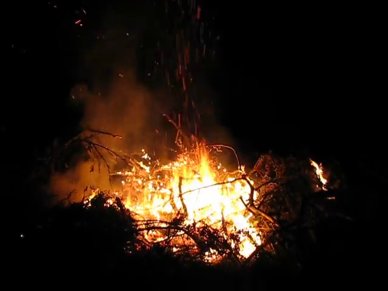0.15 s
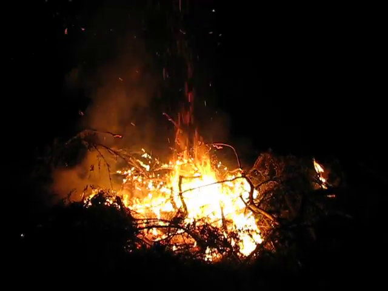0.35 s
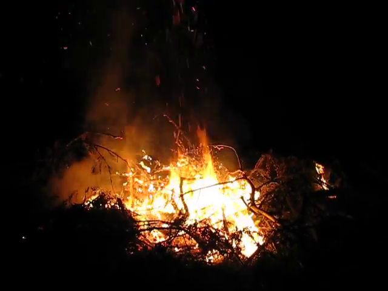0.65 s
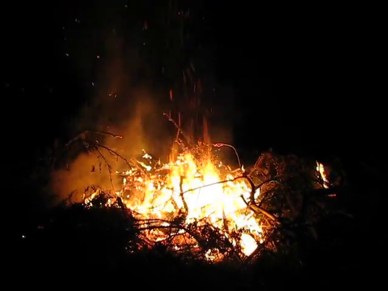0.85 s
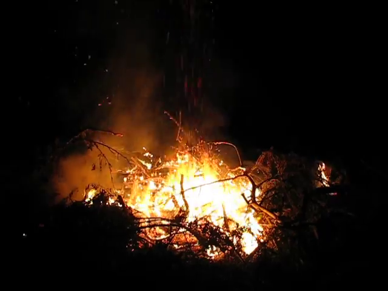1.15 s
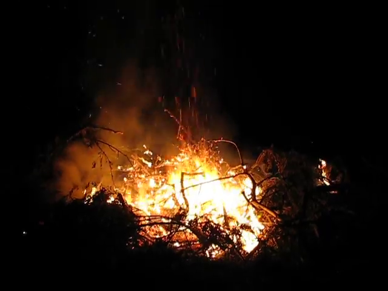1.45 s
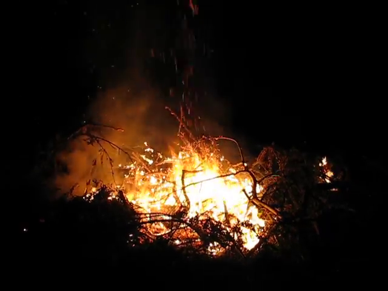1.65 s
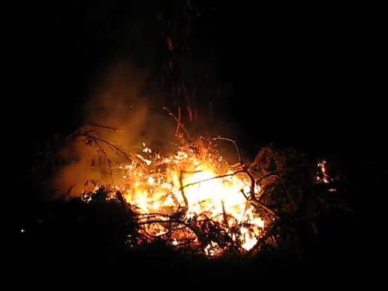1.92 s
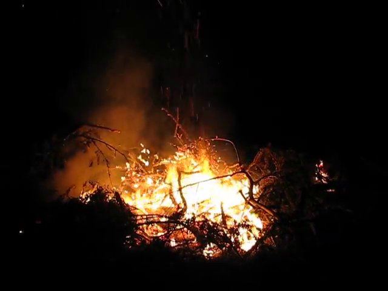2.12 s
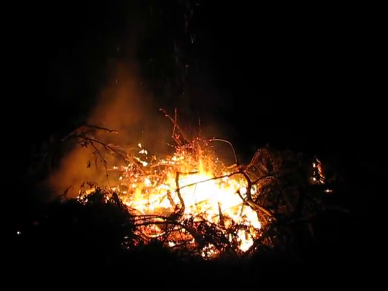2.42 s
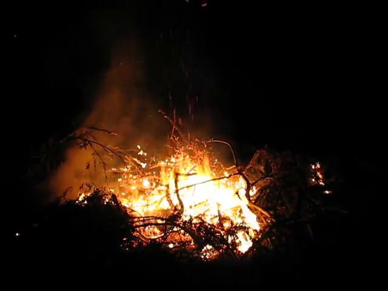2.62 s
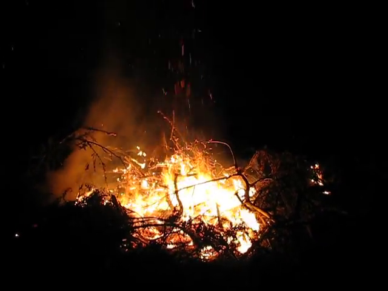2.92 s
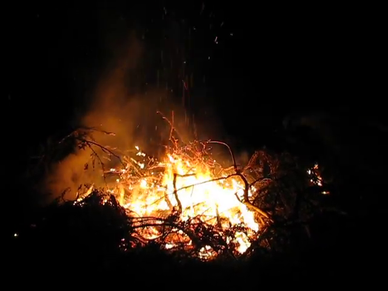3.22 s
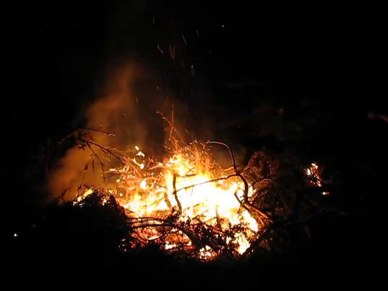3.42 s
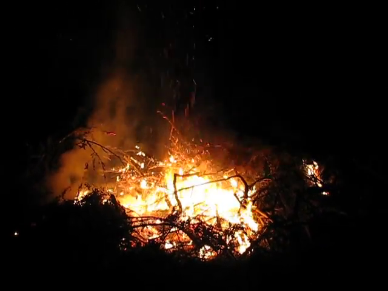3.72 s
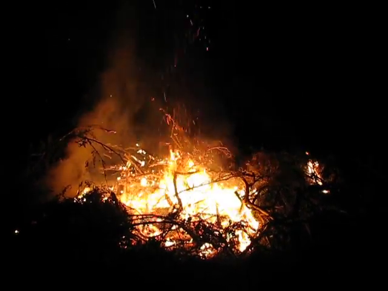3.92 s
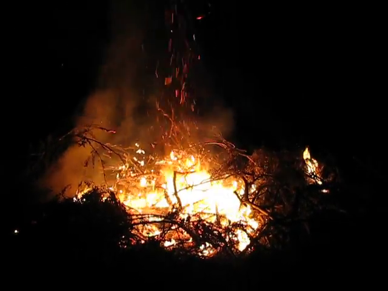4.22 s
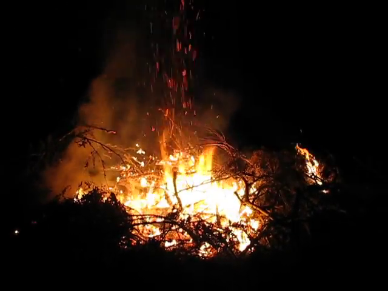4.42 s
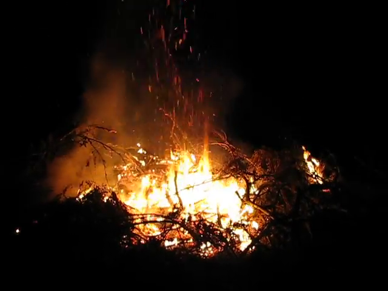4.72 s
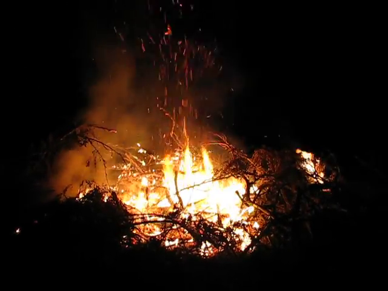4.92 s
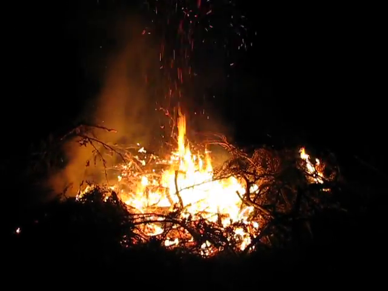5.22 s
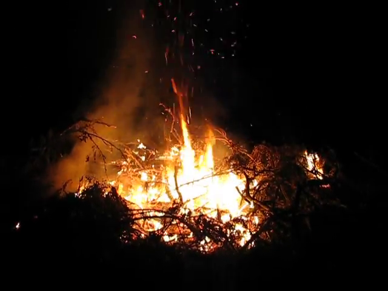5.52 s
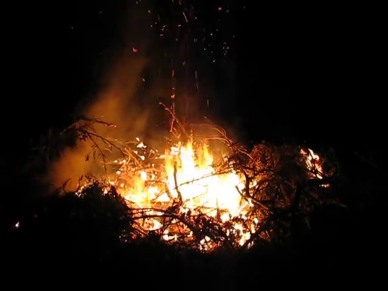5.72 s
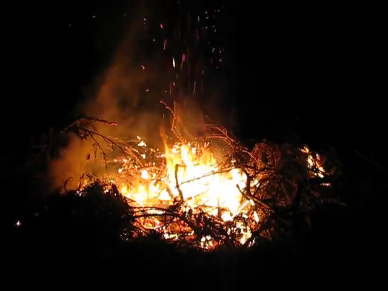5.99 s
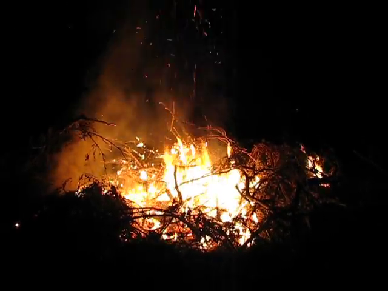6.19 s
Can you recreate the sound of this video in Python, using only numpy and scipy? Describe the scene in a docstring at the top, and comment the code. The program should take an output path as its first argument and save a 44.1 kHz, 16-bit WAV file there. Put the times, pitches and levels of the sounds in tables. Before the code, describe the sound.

Dense bonfire crackle from start to end: crisp dry snaps, clusters of tiny ticks and occasional low thumps under the pops. Breathy steam flares up briefly early on, past the middle and near the end. Low flames rumble gently, and far small night animals blend into a thin steady trill. Open air, close and wide, almost no echo, with slight gain ducking after the hardest cracks.

```python
"""Brush bonfire at night

Sap pockets burst in dry twigs a few metres away: each pop is a quick ring plus a spray of noise.
Smaller bursts make the fine crackle, and low thumps, short sums of fixed tones, lie under some pops.
Coloured noise makes the hissing steam, the low roar of flames and a far chorus of small night animals.
The camera's gain control ducks after the loudest pops, whose peaks are flattened near full scale."""
import sys
import numpy as np
from scipy import signal
from scipy.fft import rfft, irfft, next_fast_len
from scipy.io import wavfile
from scipy.ndimage import uniform_filter1d, map_coordinates

SR = 44100
rng = np.random.default_rng(int(sys.argv[2]) if len(sys.argv) > 2 else 0)


def pcm_store(signal):
    """Save signal as 16-bit PCM."""
    levels = np.round(np.clip(np.atleast_2d(signal), -1, 1) * 32767)
    wavfile.write(sys.argv[1], SR, levels.astype(np.int16).T)


N = 280014  # length in samples

# The loudest sap pockets bursting: t/s, level/dB, f/Hz of the ring, spray's fall by 60 dB/s
POPS = [(.0334, -2.5, 4430, 0.01), (.0414, -7.5, 8640, .0075), (.1483, -6.5, 6900, 0.019),
        (.1874, -3, 5160, 0.01), (.211, -17, 6900, .006), (.311, -17, 6600, .0068),
        (.4032, -11, 6230, 0.012), (.4987, -14, 7100, .0059), (.5396, -6.5, 8800, 0.0068),
        (.601, -10, 7400, 0.03), (.6137, 3, 5500, 0.008), (.7931, -4.5, 6330, 0.01),
        (.8751, -18, 4300, 0.026), (.8927, -6.5, 2550, 0.009), (.9225, -15, 4500, 0.012),
        (1.0373, 3.5, 5740, 0.0062), (1.049, -11, 7500, 0.0055), (1.427, -9, 4730, 0.0057),
        (1.5194, -12, 3830, 0.011), (1.5598, -17, 3140, .02), (1.6048, 3.5, 6600, 0.0055),
        (1.6148, -10, 5800, 0.011), (1.8143, -9, 9250, .011), (1.8489, -16, 5170, 0.02),
        (1.9118, -6, 5900, 0.0089), (1.984, -14.5, 8100, 0.01), (1.9973, -13, 9000, .007),
        (2.0126, -12, 4930, 0.012), (2.0632, -9.5, 3370, 0.03), (2.0711, -6, 4770, 0.01),
        (2.202, -3.5, 7260, 0.0037), (2.2792, -11.5, 6800, .022), (2.3612, 1, 7600, 0.0054),
        (2.5037, -15.5, 7100, 0.019), (2.5644, -5.5, 4000, 0.0057), (2.6212, -13, 6500, .0087),
        (2.6836, -12, 8250, .0077), (2.7108, -6, 4100, 0.0059), (2.7455, -3.5, 5800, 0.0071),
        (2.8524, -9, 6660, 0.0094), (2.9249, -6, 5300, 0.0018), (3.1011, -13.5, 8050, 0.022),
        (3.1339, -13.5, 5630, 0.03), (3.1582, 0.5, 6360, 0.0083), (3.2163, -5.5, 5900, 0.0069),
        (3.228, -15, 5400, 0.0043), (3.2418, -14.5, 2240, 0.033), (3.2953, -10.5, 4340, 0.0078),
        (3.3212, -9, 3900, 0.014), (3.4602, -5.5, 8050, 0.0043), (3.4964, -18, 5560, 0.042),
        (3.6067, -15, 3850, .02), (3.6774, -13.5, 6200, 0.029), (3.6979, -10, 6900, 0.0078),
        (3.7789, -10.5, 7500, .01), (3.8304, -9.5, 4730, 0.0098), (3.9412, -7, 9350, .0024),
        (3.9703, -12, 5100, 0.011), (3.9939, -3, 7500, 0.0062), (4.1385, -11.5, 8550, .0069),
        (4.2099, -11.5, 6140, 0.0095), (4.2245, -8, 9100, 0.005), (4.2515, -2.5, 7800, .0073),
        (4.3804, -8.5, 5550, .013), (4.389, -7, 2520, 0.011), (4.408, -11, 5170, 0.0088),
        (4.4317, -5.5, 7200, 0.0055), (4.4613, -10, 7800, 0.02), (4.4701, -12, 7100, .0071),
        (4.516, 8.5, 2600, 0.0044), (4.6246, -9.5, 7950, 0.0081), (4.6686, -10, 7000, .0091),
        (4.6741, -4.5, 4830, 0.0042), (4.69, -9, 8600, 0.012), (4.7349, -10.5, 7700, 0.015),
        (4.7472, -6, 6200, 0.011), (4.7771, -8.5, 6760, 0.027), (4.8675, -7.5, 8300, 0.015),
        (4.9208, -13, 7900, 0.0071), (4.9638, -10.5, 5760, .011), (5.0144, -8.5, 6500, 0.024),
        (5.1346, -6.5, 7150, 0.0083), (5.1983, -5.5, 5500, 0.014), (5.2433, 8, 4460, 0.007),
        (5.4518, -7.5, 6500, 0.0099), (5.5461, -7.5, 5030, 0.016), (5.5873, -11, 4630, 0.0086),
        (5.6137, -12, 8800, .006), (5.7257, -7, 9900, 0.0085), (5.7313, -3.5, 7800, 0.0057),
        (5.7395, -7, 5560, 0.013), (5.8079, -15, 7900, .013), (5.8898, -8, 5140, 0.0064),
        (5.8969, -3.5, 4800, 0.016), (5.9157, -7, 8300, 0.0057), (6.0997, -4, 5750, 0.0055),
        (6.1636, -14, 8600, 0.016), (6.1739, -7, 8850, .0045), (6.1956, -11, 5100, 0.031),
        (6.2941, -6, 4300, .0094), (6.3319, -5, 6500, 0.0049)]


def pops():
    """The loudest sap pockets burst at their listed times."""
    return bursts(POPS)


TICK_DB, TICK_SPREAD_DB, TICK_TOP_DB = -31, 6.5, -17  # lowest level, mean excess before the cap, cap
TICK_HZ, TICK_T60_S = 7500, .0045  # middle pitch and spray fade
RUN_GAP_S, REST_GAP_S, RUN_SHARE = .004, .02, .5  # mean gap in a run, mean gap otherwise, share in runs


def crackle(count=1100):
    """Many small twigs tick at random, most of them faint, often a few in a row."""
    u, g = rng.random((count, 3)), rng.standard_normal((count, 2))
    mean_gap = np.where(u[:, 2] < RUN_SHARE, RUN_GAP_S, REST_GAP_S)
    s = np.cumsum(-np.log(u[:, 0]) * mean_gap) % (N / SR)  # times past the end wrap to the start
    db = np.minimum(TICK_DB - TICK_SPREAD_DB * np.log(u[:, 1]), TICK_TOP_DB)
    hz = np.clip(TICK_HZ * np.exp(0.36 * g[:, 0]), 700, 13000)
    t60 = TICK_T60_S * np.exp(0.92 * g[:, 1])
    return bursts(np.transpose([s, db, hz, t60]), size=256)


RING_SIZE, SPRAY_SIZE, SPRAY_RISE_S = 2.4, .45, .0002
RING_CYCLES = 3.5  # cycles in which the ring falls by 60 dB


def bursts(rows, size=512):
    """Each burst: a sudden pull that rings a cycle or two, and a spray of splinters."""
    s, db, hz, t60 = np.transpose(rows)[:, :, None]
    t = np.arange(size) / SR
    luck = rng.standard_normal((len(s), 2, size))
    fade = amp(-60 * t / np.clip(t60, .002, .04)) * (1 - np.exp(-t / SPRAY_RISE_S))
    ring_fade = amp(-60 * t * hz / RING_CYCLES) * (1 - np.exp(-t * hz / 0.23))
    ring = -np.sin(2 * np.pi * hz * t) * ring_fade

    r = np.fft.rfftfreq(size, 1 / SR) / hz  # frequency over the ring's pitch
    near = 1j * r / (1 - r * r + 1.4j * r)  # splinters gather around that pitch
    roof = 1 / (1 - (r / 2.33) ** 2 + 1j * r / 1.23) + 0.03  # a big pocket gives little far above it
    grains = luck * abs(luck) * fade[:, None]
    spray = irfft(rfft(grains) * (near * roof)[:, None], size)
    fade_energy = np.sum(fade ** 2, axis=1)[:, None, None]
    spray *= np.sqrt(fade_energy / np.sum(spray ** 2, axis=2, keepdims=True))
    ring = irfft(rfft(ring) * 8j * r / (1 + 8j * r), size)  # a small pocket moves no bass

    mid = RING_SIZE * ring + SPRAY_SIZE * spray[:, 0]
    lean = 0.006 + 0.2 * luck[:, 0, :1]  # random left-right lean of each burst
    side = lean * mid + 0.34 * spray[:, 1]
    return paired(laid(s, amp(db) * mid), laid(s, amp(db) * side))


# Low thumps, most of them under a pop: t/s, level/dB, centre f/Hz
THUMPS = [(.0334, -14.5, 483), (.1478, -18, 1030), (.6123, -34, 630), (.8924, -23, 496), (1.0368, -40, 500),
          (1.6042, -41, 700), (2.0621, -39, 900), (2.826, -19.5, 810), (2.9244, -27, 775),
          (2.982, -20, 1030), (3.2408, -18, 780), (3.2675, -20, 760), (3.6052, -19, 636),
          (3.6773, -17, 770), (4.3872, -31, 920), (4.5158, -30, 684), (4.6735, -20, 876),
          (4.7775, -21, 390), (5.24, 4.5, 530), (5.5459, -22, 1060), (5.7382, -22, 620),
          (5.8961, -19.5, 610)]
# Fixed tones that make up every thump: f/Hz, level/dB, fall by 60 dB/s
THUMP_TONES = [(275, 6.5, 0.01), (738, -1, 0.012), (910, -18, .0048), (1590, -3, 0.0043)]
OFF_CENTRE_DB, THUMP_RISE_S = 5.6, .0008  # a tone's loss per octave from the centre; rise time


def thumps(size=1024):
    """Each thump is a short sum of fading tones, strongest near its centre frequency."""
    s, db, centre_hz = np.transpose(THUMPS)[:, :, None]
    t = np.arange(size) / SR
    wave = 0
    for hz, level, t60 in THUMP_TONES:
        loss = OFF_CENTRE_DB * abs(np.log2(hz / centre_hz))
        wave = wave - np.cos(2 * np.pi * hz * t) * amp(level - loss - 60 * t / t60)
    return laid(s, amp(db) * wave * (1 - np.exp(-t / THUMP_RISE_S)))


# Scatter among the branches: f/Hz, fall by 60 dB/s
HEAP_TAIL = [(300, 0.14), (3000, 0.11), (12000, 0.078)]


def heap(x):
    """The pile and the ground scatter each snap into a short tail."""
    hz, t, z = signal.stft(paired(*rng.standard_normal((2, 4096))), SR, nperseg=128)
    fade = amp(-60 * t / along(HEAP_TAIL, hz)[:, None])
    tail = signal.istft(z * fade, SR, nperseg=128)[1]
    return signal.fftconvolve(x, tail / np.linalg.norm(tail[0]), axes=1)[:, :N]


# Steam from the wood, for both sizzle and jet: t/s, sizzle level/dB, jet level/dB
STEAM = [(0, -42.5, -58), (.4, -40.5, -40), (.58, -31, -37), (.7, -39, -47), (.9, -39.5, -40),
         (1.2, -40, -46), (1.5, -39, -38), (1.75, -43, -42.5), (2.1, -46, -54), (2.7, -43, -49),
         (3.2, -38.5, -47), (3.35, -43.5, -55), (3.63, -44, -54), (3.69, -32, -36), (3.85, -32.5, -43),
         (3.92, -40, -52), (5.3, -42.5, -72), (5.68, -45.5, -60), (5.76, -33.5, -48), (5.92, -35.5, -37.5),
         (6.35, -41.5, -49)]
# Colour of the sizzle: f/Hz, relative level/dB
SIZZLE = [(300, -20), (700, -0.5), (1500, 2.5), (3400, 8), (7700, 5), (11000, 2.5), (16000, -0.5)]


def sizzle():
    """Steam leaving the wood as broad, fluttering noise."""
    level_db = curves(STEAM)[0] + 2.5 * wobble(130) + 1.8 * wobble(22)
    return amp(level_db) * rush(lambda hz: amp(along(SIZZLE, hz)), patchy_db=.7)


# Colour of the jets: f/Hz, relative level/dB
JET = [(5000, -38), (9000, -11), (12500, 5.5), (16000, 2.5)]


def jet():
    """Sharper steam jets: noise weighted to the high treble."""
    level_db = curves(STEAM)[1] + 1.5 * wobble(90)
    return amp(level_db) * rush(lambda hz: amp(along(JET, hz)), patchy_db=.7)


# The steady background, for both roar and chorus: t/s, roar level/dB, chorus level/dB
FIRE = [(0, -40.5, -40.5), (.7, -41, -42), (1.45, -44, -44), (2.3, -42, -41), (3.4, -42, -41),
        (4.1, -39.5, -38), (5.1, -37.5, -39.5), (5.6, -43, -42.5), (6.35, -38.5, -39)]
# Colour of the roar: f/Hz, relative level/dB
ROAR = [(15, -15), (25, -1), (156, 2), (285, -4.5), (460, -16.5), (867, -15.5), (1030, -23), (1500, -22),
        (1950, -15), (3300, -120)]


def roar():
    """Flames roar as low noise that swells slowly."""
    level_db = curves(FIRE)[0] + 0.8 * wobble(4.8)
    return amp(level_db) * rush(lambda hz: amp(along(ROAR, hz)), patchy_db=-0.33)


# Voices of the small night animals: f/Hz, width/Hz, relative level/dB
CHORUS = [(2060, 77, 2), (2130, 110, 2.5), (2508, 330, 7.5), (2850, 176, 6)]


def chorus():
    """Far small animals blend into noise in narrow bands, stronger on the right."""
    def voices(f):
        power = sum(amp(2 * db) / (1 + ((f - hz) * 2 / w) ** 4) for hz, w, db in CHORUS)
        return np.sqrt(power)

    left_right_db = np.array([[-2.2], [2.2]])
    level_db = curves(FIRE)[1] + 1.16 * wobble(60) + left_right_db
    return amp(level_db) * rush(voices, patchy_db=0.0)


def rush(colour, patchy_db):
    """Coloured stereo noise of rms 1, with patches of random gain over time and frequency."""
    z = signal.stft(rng.standard_normal((2, N)), nperseg=256)[2]
    field = uniform_filter1d(rng.standard_normal(z.shape[1:]), size=5, axis=0)
    field = uniform_filter1d(field, size=8, axis=1)
    pair = signal.istft(z * amp(patchy_db * unit(field)), nperseg=256)[1][:, :N]
    return unit(paired(*pair, colour))


# How alike left and right are when mid and side come in equally strong: f/Hz, likeness (1 = identical)
ALIKE = [(100, .9985), (300, .994), (700, .96), (1400, .86), (2500, .5), (4000, .36), (7000, .16),
         (15000, .25)]


def paired(mid, side, colour=np.ones_like):
    """Left and right from two coloured sounds, most alike in the bass, as at two close microphone ports."""
    def shares(hz):
        turn = np.arccos(np.clip(along(ALIKE, hz), -1, 1)) / 2
        return colour(hz) * np.array([np.cos(turn), np.sin(turn)])

    mid, side = filtered(np.array([mid, side]), shares)
    return np.array([mid + side, mid - side])


def amp(db):
    """Gain of a level in dB."""
    return 10 ** (np.asarray(db) / 20)


def unit(x):
    """x at rms 1."""
    return x / np.sqrt(np.mean(x ** 2) + 1e-20)


def along(points, hz):
    """Values read between (Hz, value) points on a log frequency axis."""
    f, v = np.transpose(points)
    return np.interp(np.log(hz + 1), np.log(f + 1), v)


def wobble(rate):
    """A smooth random curve with rate random points a second."""
    return map_coordinates(rng.standard_normal(int(N * rate / SR) + 4), [np.arange(N) * rate / SR])


def filtered(x, response):
    """x with each frequency scaled by the response."""
    m = next_fast_len(x.shape[-1] + 4096, real=True)  # spare room at the end
    return irfft(rfft(x, m) * response(np.fft.rfftfreq(m, 1 / SR)), m)[..., :x.shape[-1]]


def curves(rows):
    """One value per sample for each column after the time."""
    s, *cols = np.transpose(rows)
    return [np.interp(np.arange(N) / SR, s, c) for c in cols]


def laid(s, waves):
    """Rows of short waves summed at their times."""
    where = np.round(s * SR).astype(int) + np.arange(waves.shape[1])
    return np.bincount(where.ravel(), waves.ravel(), N + waves.shape[1])[:N]


SCATTER_DB = -16  # level of the scattered tail


def scene():
    """Snaps with their scatter, over the steady fire and the night."""
    snaps = pops() + crackle() + thumps()
    background = sizzle() + jet() + roar() + chorus()
    return snaps + amp(SCATTER_DB) * heap(snaps) + background


TOP_HZ = 15900  # nothing is kept from here up


def record(dry):
    """Gain falls just after loud moments and creeps back; peaks flatten near full scale; a band limit."""
    x = signal.lfilter(*signal.butter(1, 25, "high", fs=SR), dry)  # small ports lose the deepest bass
    keep = np.exp(-1 / (.1 * SR))  # power averaged over about 0.1 s
    power = signal.lfilter([1 - keep], [1, -keep], np.mean(x ** 2, axis=0))
    late = np.pad(power, (SR // 150, 0))[:N]  # the gain reacts about 7 ms late
    x = x / np.sqrt(1 + (late / amp(-47)) ** 2)
    x = x / (1 + np.abs(x) ** 8) ** (1 / 8)
    return filtered(x, lambda hz: hz < TOP_HZ)


dry = scene()
out = record(dry)
pcm_store(out)
```